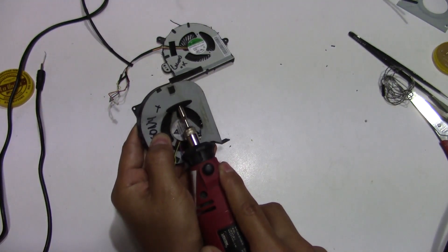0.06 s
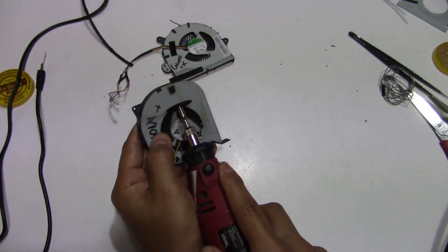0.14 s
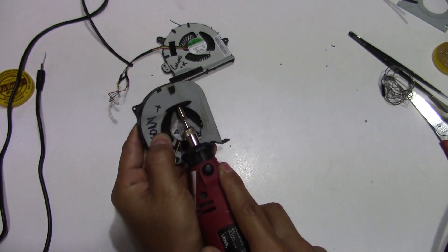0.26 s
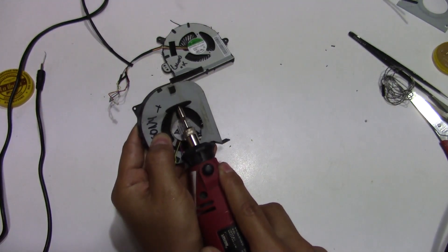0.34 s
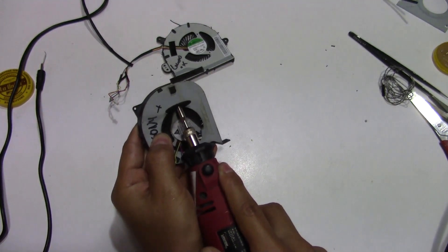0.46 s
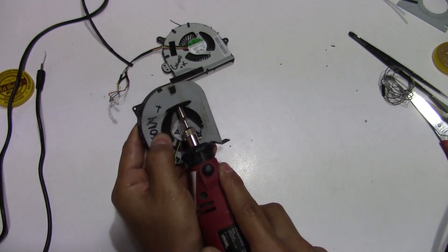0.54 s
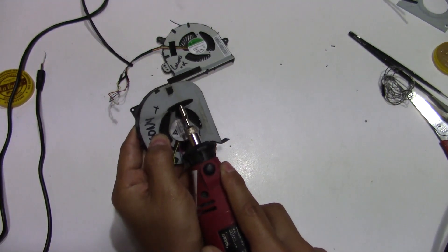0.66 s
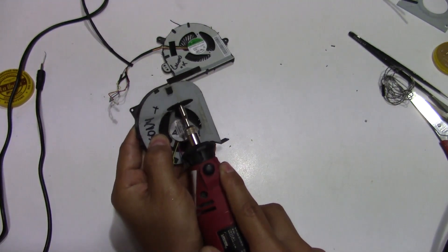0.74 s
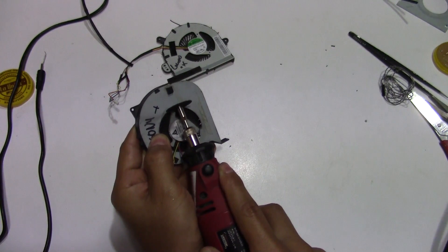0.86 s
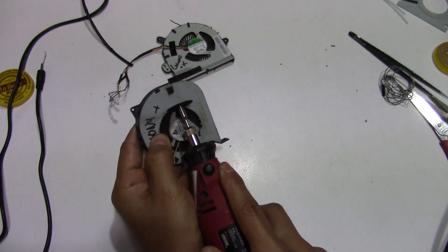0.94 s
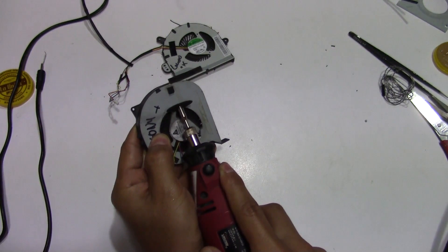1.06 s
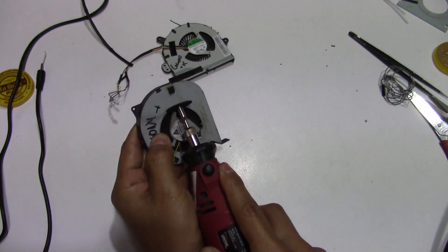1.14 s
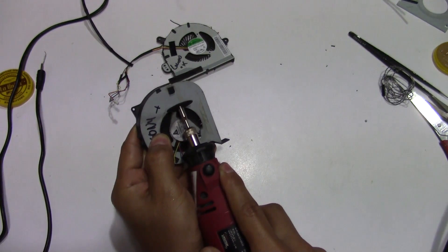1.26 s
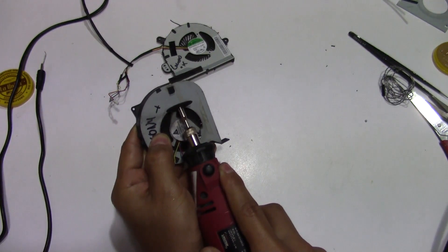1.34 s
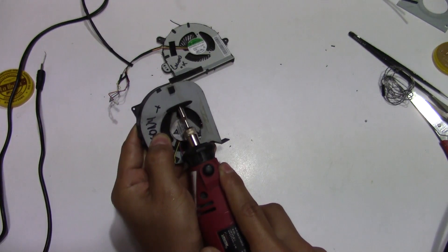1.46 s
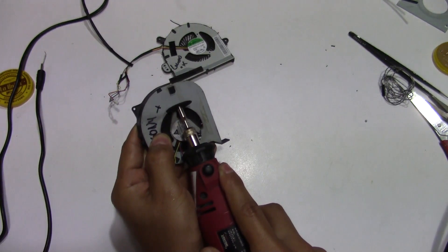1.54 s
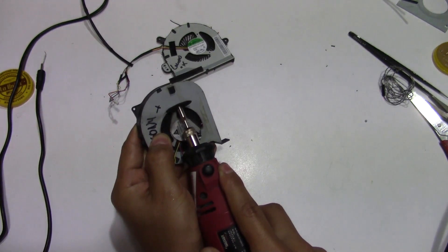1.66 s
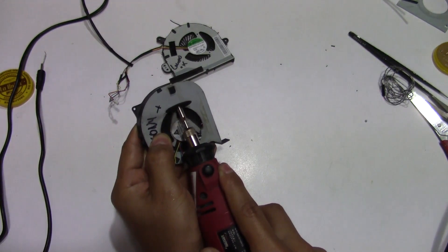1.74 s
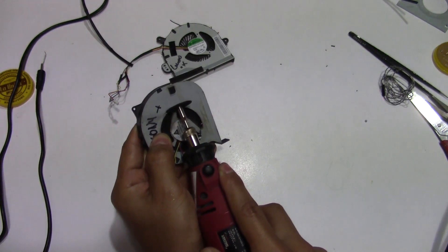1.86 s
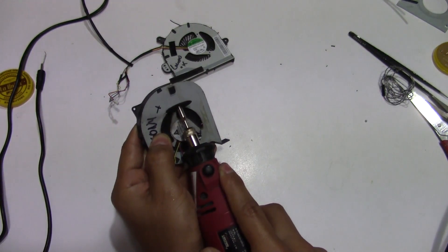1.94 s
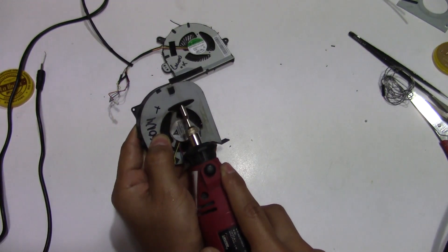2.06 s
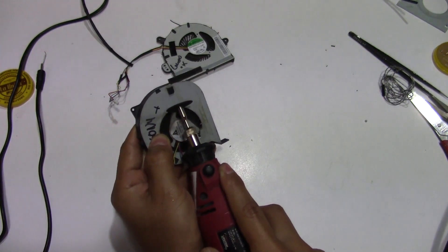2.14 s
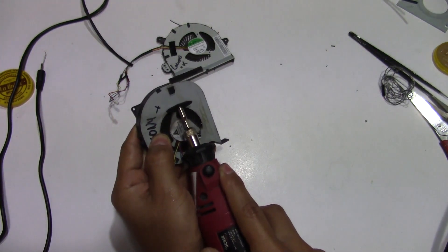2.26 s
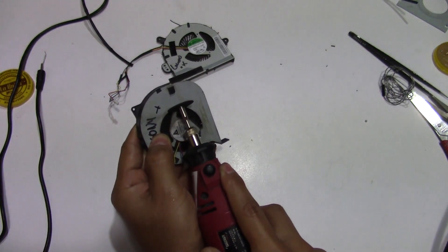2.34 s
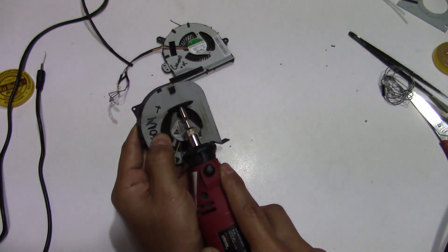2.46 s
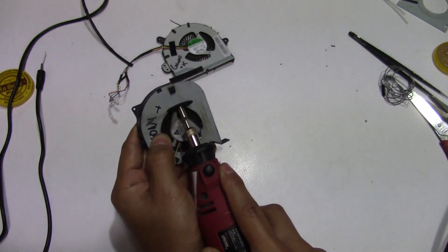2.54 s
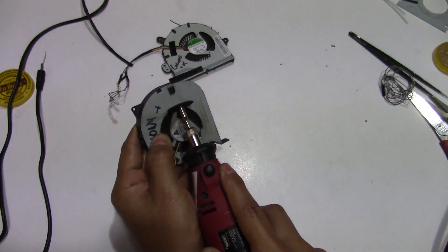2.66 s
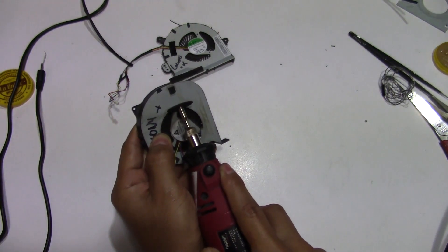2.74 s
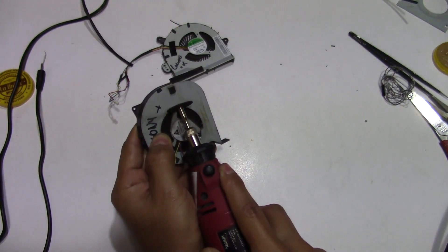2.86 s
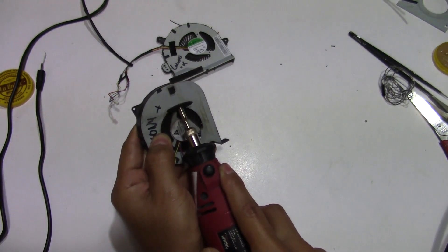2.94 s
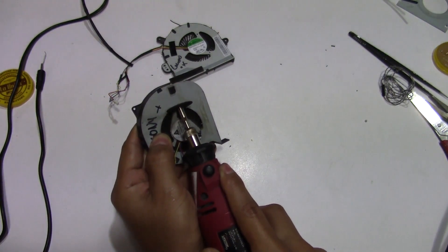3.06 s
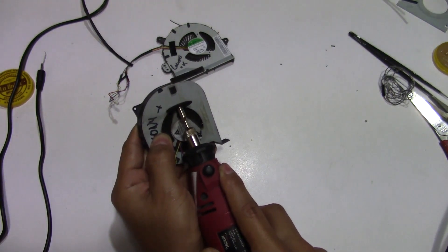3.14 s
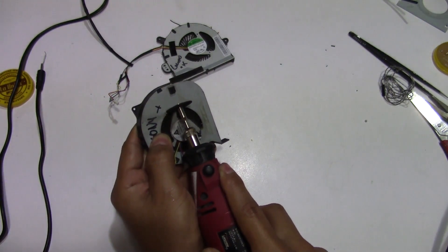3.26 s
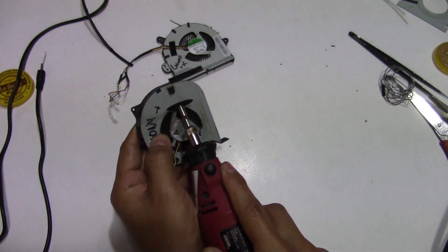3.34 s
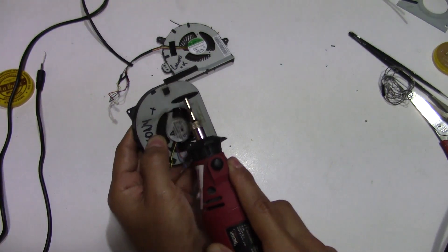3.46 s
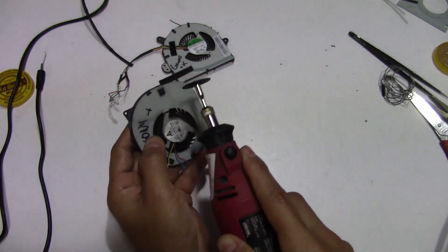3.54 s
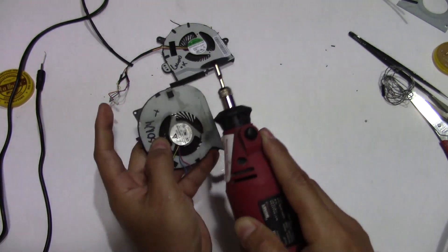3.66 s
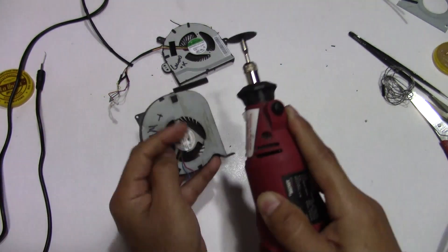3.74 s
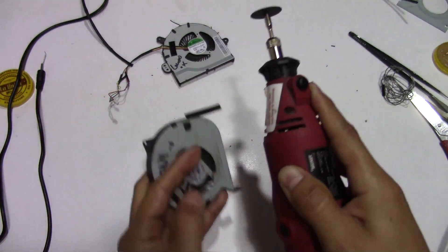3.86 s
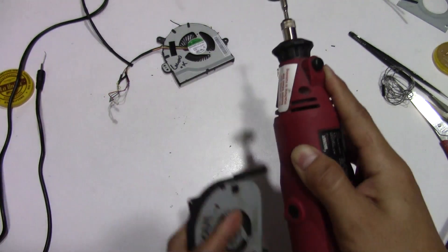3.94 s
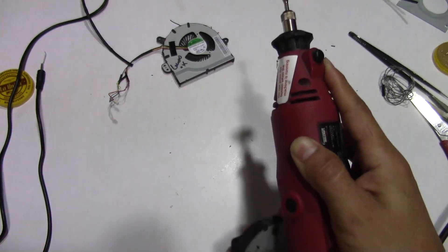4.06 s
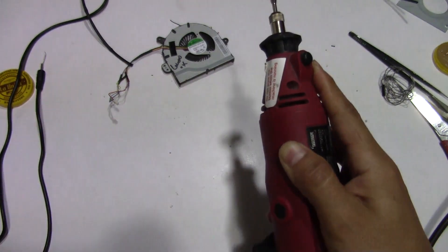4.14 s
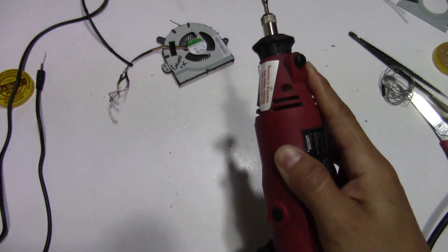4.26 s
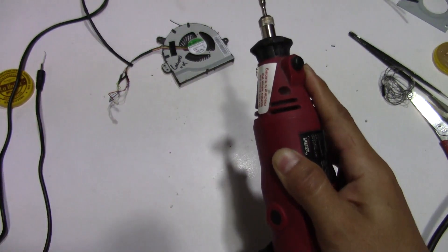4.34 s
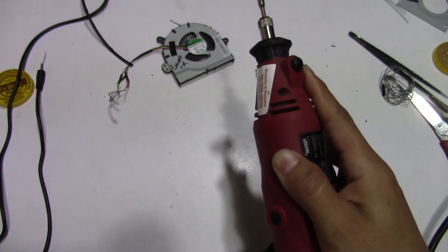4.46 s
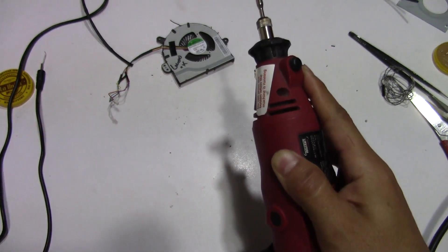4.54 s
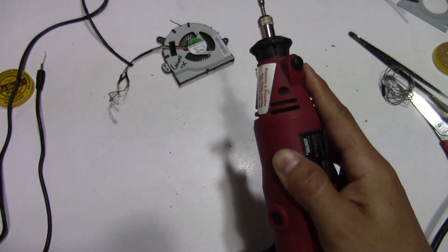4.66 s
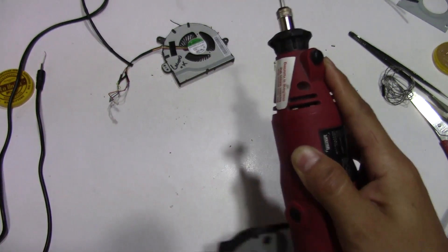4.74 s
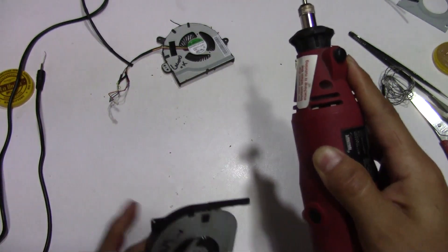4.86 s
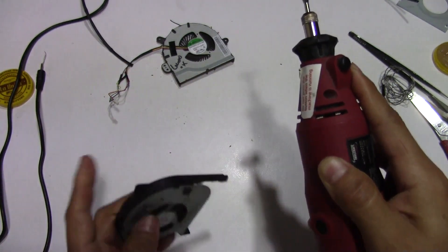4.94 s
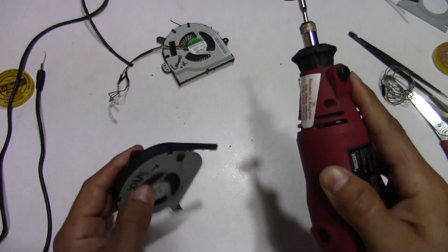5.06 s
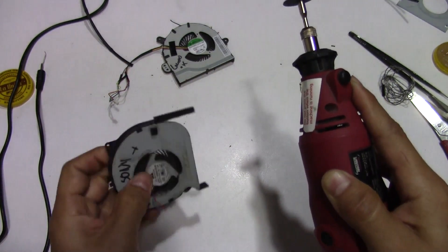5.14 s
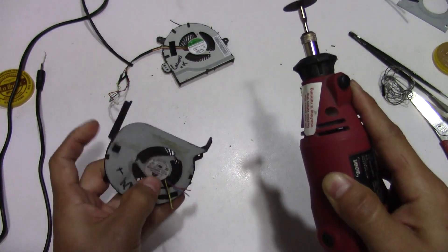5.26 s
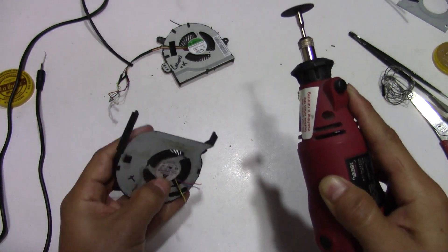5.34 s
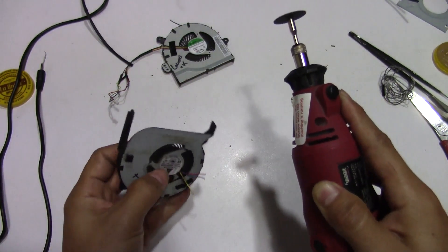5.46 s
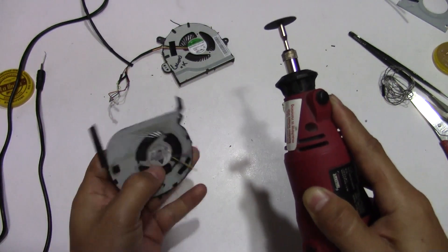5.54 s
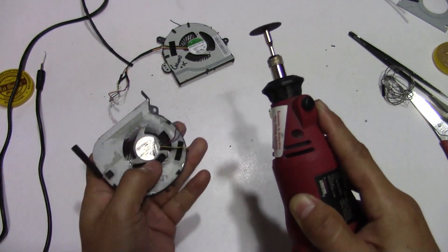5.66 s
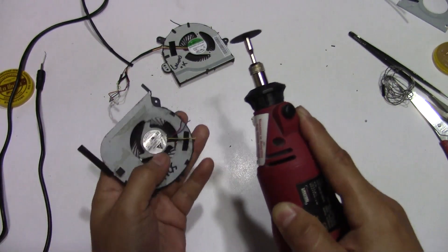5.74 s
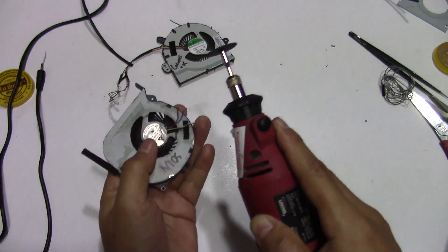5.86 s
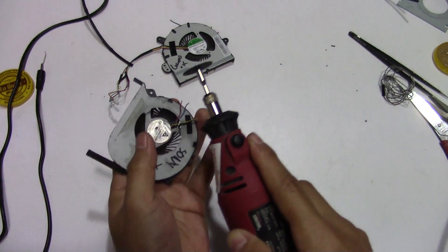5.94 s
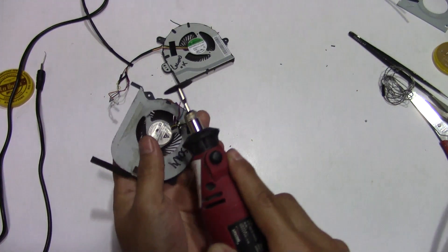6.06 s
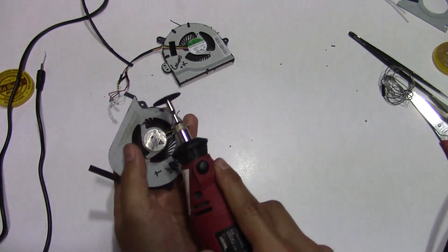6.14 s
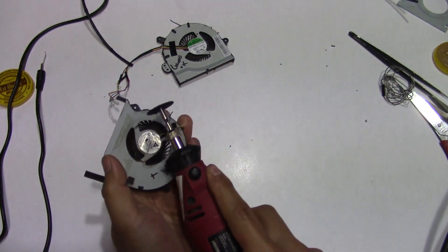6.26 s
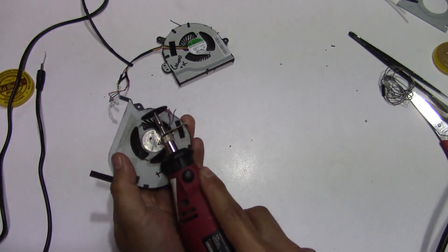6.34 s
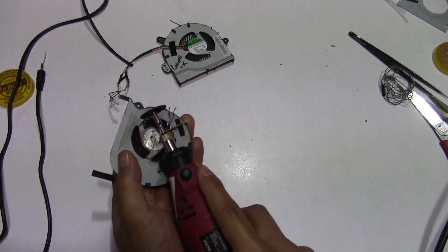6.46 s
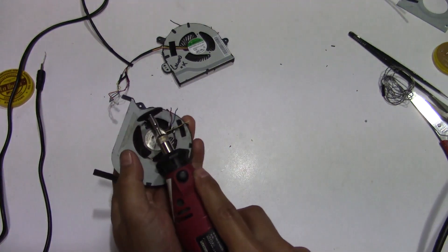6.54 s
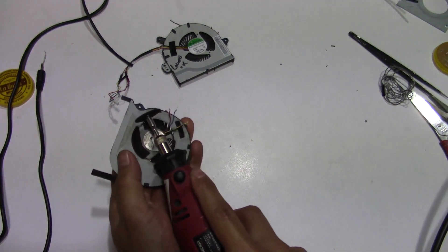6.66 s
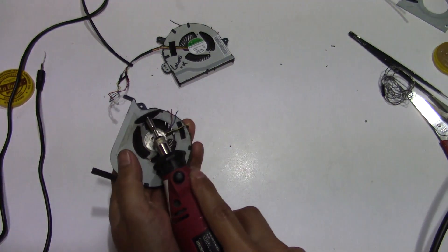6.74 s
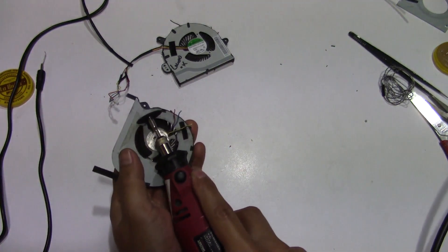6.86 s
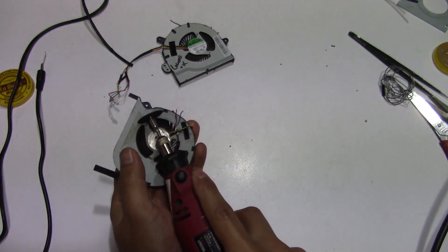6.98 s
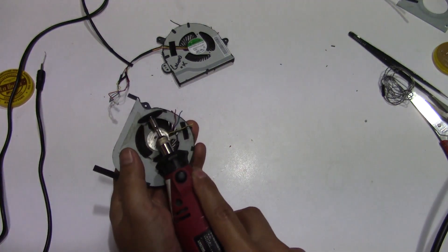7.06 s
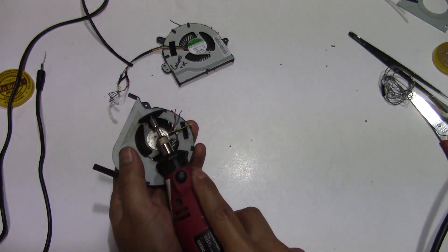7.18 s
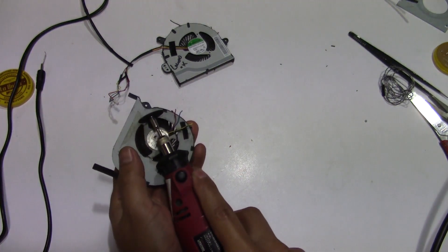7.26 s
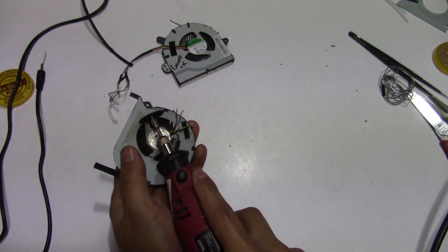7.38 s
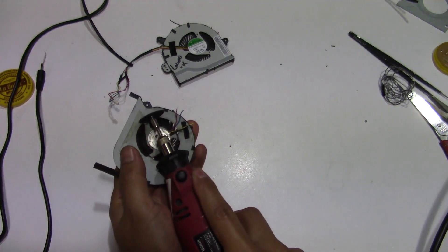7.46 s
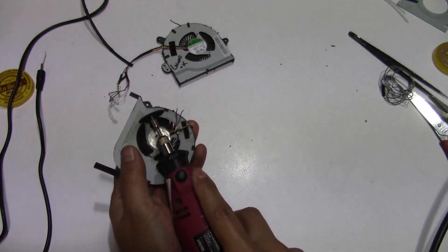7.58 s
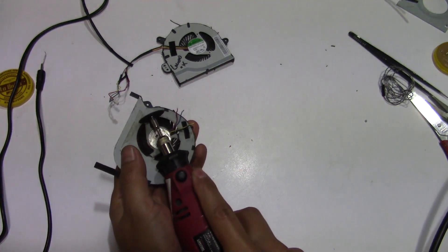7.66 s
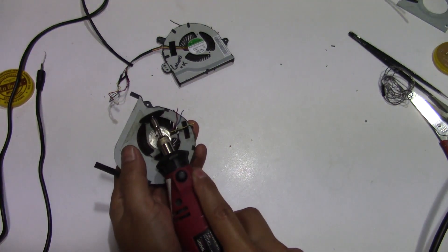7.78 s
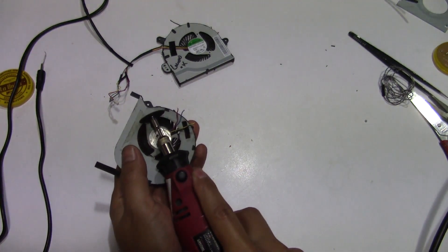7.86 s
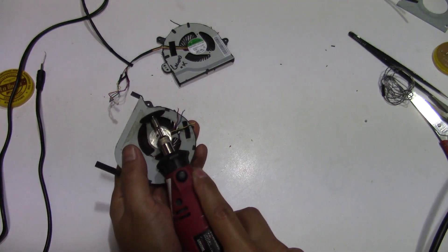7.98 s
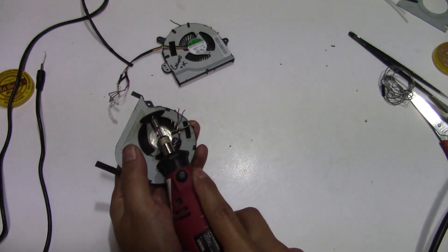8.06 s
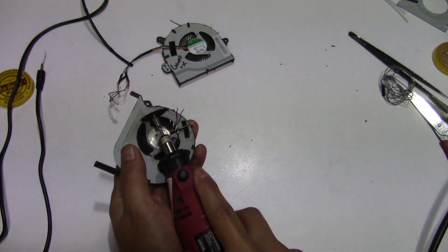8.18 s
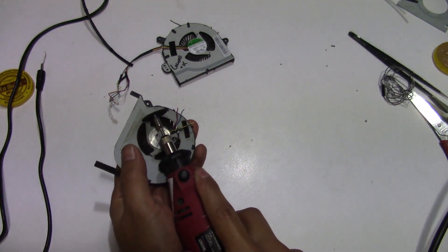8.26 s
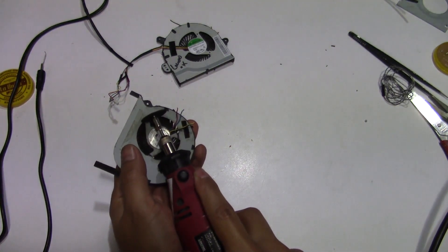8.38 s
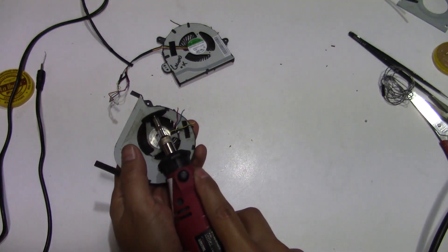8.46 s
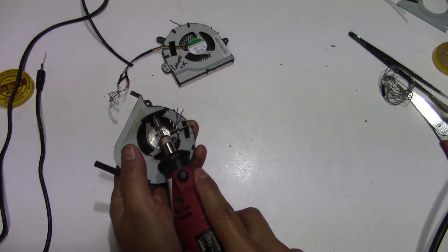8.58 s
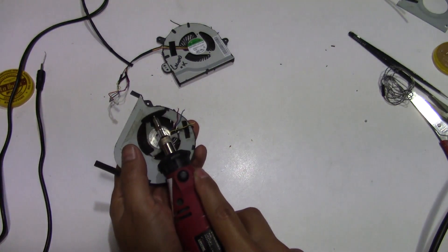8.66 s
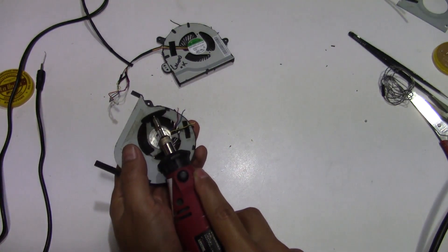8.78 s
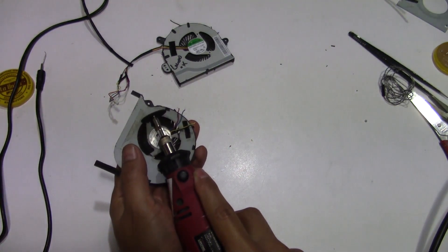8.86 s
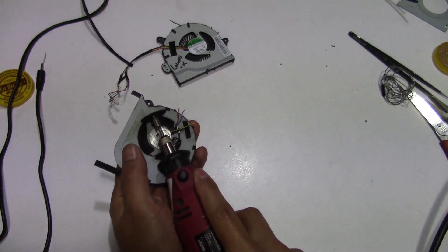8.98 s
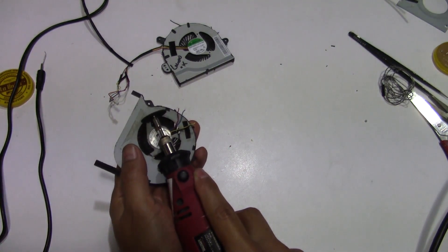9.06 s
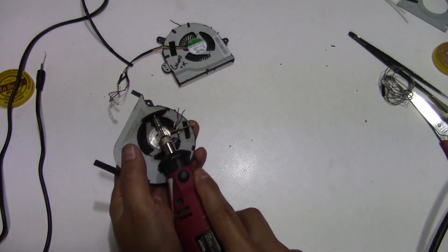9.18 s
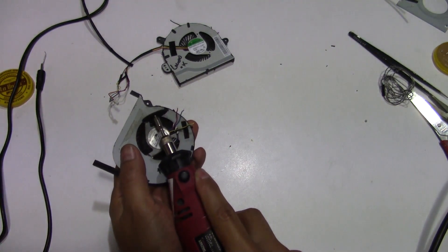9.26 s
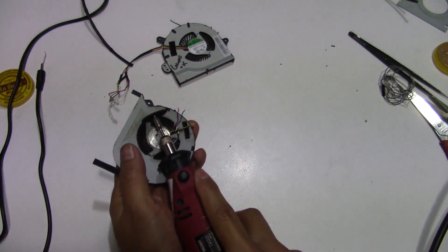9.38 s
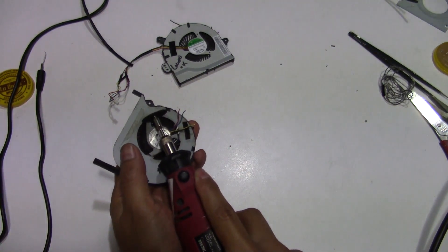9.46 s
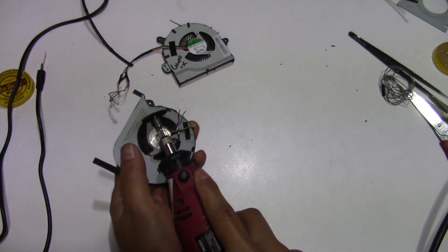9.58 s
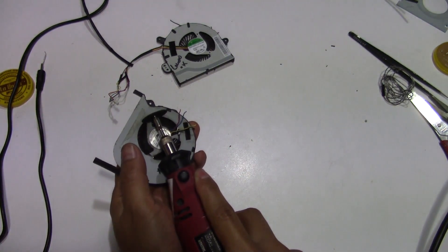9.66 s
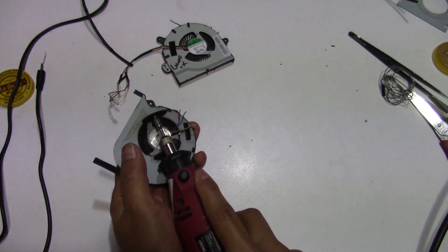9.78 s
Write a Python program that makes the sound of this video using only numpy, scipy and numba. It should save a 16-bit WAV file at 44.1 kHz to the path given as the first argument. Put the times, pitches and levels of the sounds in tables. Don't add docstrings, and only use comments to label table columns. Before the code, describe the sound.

Small electric cutting disc grinds a thin plastic frame, motor bogging and recovering, then climbing to a high whine before shrill, scraping cuts at close range.

```python
import sys
import numpy as np
from scipy import signal
from scipy.fft import rfft, irfft
from scipy.io import wavfile
from scipy.ndimage import uniform_filter1d, minimum_filter1d
from numba import njit

SR = 44100
rng = np.random.default_rng(int(sys.argv[2]) if len(sys.argv) > 2 else 0)


def gain_from_db(level_db):
    decades = np.asarray(level_db, float) / 20
    return 10 ** decades


def inscribe(sig):
    pcm = np.round(np.clip(np.atleast_2d(sig).T, -1, 1) * 32767)
    wavfile.write(sys.argv[1], SR, pcm.astype(np.int16))


N = 432621
T, HZ = np.arange(N) / SR, np.fft.rfftfreq(N, 1 / SR)
MAINS_HZ = 120
FAN_LIMIT_HZ = 255
TURNED_S = 5


def unit(x):
    return x / np.sqrt(np.mean(x ** 2))


def points(table):
    f, db = np.transpose(table)
    return gain_from_db(np.interp(np.log(HZ + 1), np.log(f), db))


def resonances(table, hz, valley_db, order=1):
    peaks = sum(gain_from_db(db) ** 2 / (1 + (2 * (hz - f) / w) ** 2) ** order for f, w, db in table)
    return np.sqrt(gain_from_db(valley_db) ** 2 + peaks)


def dip(hz, width, db):
    return gain_from_db(db * np.exp(-((HZ - hz) / width) ** 2))


def above(hz, power):
    return 1 / (1 + (hz / (HZ + 1)) ** power)


def halves(x, gain, lo_hz, split_hz):
    spec = rfft(x) * gain
    over = above(split_hz, 6)
    power = np.abs(spec) ** 2 * 2 / N ** 2
    low_rms = np.sqrt(power[(HZ > lo_hz) & (HZ < split_hz)].sum())
    high_rms = np.sqrt(power[HZ > split_hz].sum())
    return irfft(spec * (1 - over), N) / low_rms, irfft(spec * over, N) / high_rms


def walk(rate):
    k = int(SR / rate)
    return 0.14 * uniform_filter1d(np.repeat(rng.standard_normal(N // k + 1), k), k)[:N]


def throb(turns, depth, sharp):
    swell = np.exp(sharp * (np.cos(2 * np.pi * turns) - 1))
    return unit(1 + depth * unit(swell))


def rough_band(rate, angle):
    return unit(walk(rate) * np.sin(angle) + walk(rate) * np.cos(angle))


@njit
def repeat(x, lag, share):
    y = np.zeros(len(x))
    for i in range(len(x)):
        k = int(lag[i])
        y[i] = x[i] * np.sqrt(1 - share[i] ** 2)
        if i > k + 1:
            y[i] += share[i] * ((1 + k - lag[i]) * y[i - k] + (lag[i] - k) * y[i - k - 1])
    return y


# loaded t/s, f/Hz, freed t/s, f/Hz
BOGS = [
    (0.0, 68, 0.72, 31.5),
    (1.0, 83.5, 2.07, 31.7),
    (2.44, 91, 3.3, 24.5),
]
# t/s, f/Hz
SPIN_UP = [(3.5, 41.4), (3.85, 79.5), (4.15, 113.3), (4.39, 132.7), (4.76, 163.6), (5.21, 190),
           (5.9, 215.6), (6.36, 225.8), (6.91, 234.7)]
# t/s, f/Hz
LATE = [(7.3, 238.3), (7.65, 238.8), (7.96, 238.3), (8.23, 218.3), (8.57, 222.3), (8.9, 201.5), (9.28, 178),
        (9.59, 192.8), (9.81, 193.5)]


def shaft():
    s, hz = np.concatenate([np.reshape(BOGS, (-1, 2)), SPIN_UP[:1]]).T
    place = np.interp(T, s, np.arange(len(s)))
    k = np.minimum(place.astype(int), len(s) - 2)
    bend = np.where(k % 2, 1.25, 1.5)
    early = hz[k + 1] + (hz[k] - hz[k + 1]) * (1 - (place - k)) ** bend
    s, hz = np.transpose(SPIN_UP + LATE)
    late = FAN_LIMIT_HZ * np.tanh(np.interp(T, s, np.arctanh(hz / FAN_LIMIT_HZ)))
    return np.where(T < s[0], early, late)


# f/Hz, low rush level/dB, high rush level/dB, whine level/dB, slot whine level/dB
MOTOR = [(29.2, -37, -58.5, -42, -26.5), (47, -34.5, -38, -42, -22), (77.5, -33, -29.5, -44, -19),
         (110, -31.5, -23.5, -40, -13), (160, -29, -22.5, -37, -5.5), (189, -25, -21, -32.5, -4),
         (236, -23, -20.5, -29, -2), (228.5, -21.5, -21, -26, -2)]


def by_speed(hz):
    at, *columns = np.transpose(MOTOR)
    return [np.interp(hz, at, c) for c in columns]


def line(turns, k, blur):
    blur = np.clip(blur, 0, 1)
    angle = 2 * np.pi * (round(k) * turns + k * 0.0022 * walk(40) + rng.random())
    rough = rough_band(k * 9, angle) / np.sqrt(2)
    return np.sqrt(1 - blur ** 2) * np.sin(angle) + blur * rough


SLOTS = (8, 16, 24, 32, 40, 48, 56, 64, 72, 80)
SLOTS_DB = (-11, -2, -1, -3, -11.5, -11, -11, -10.5, -11, -12)
SLOT_LOAD_DB = (5, -2.5, -1, 1, 10, 7, -1, 2, 7, 3)
SLOT_BLUR = (.08, .5, .3, .6, .7, 1.8, 1.8, 2.6, 3, 3)
SLOT_GULP = (.15, 1.2, .8, .8, .4, .5, .5, .5, .5, .5)
# f/Hz, width/Hz, level/dB
SLOT_RINGS = [(890, 340, -15), (1400, 166, -16), (1900, 120, -22), (2753, 390, -13), (3914, 400, -15.5),
              (4280, 260, -18.5), (4800, 240, -25), (6350, 900, -22), (7000, 450, -23), (8840, 1100, -18),
              (10700, 1200, -17), (13300, 1400, -26), (15000, 1200, -30)]
# f/Hz, width/Hz, level/dB
SLOT_RINGS_DOWN = [(1514, 250, -20), (1910, 310, -25.5), (2830, 530, -17), (3530, 470, -24.5),
                   (3820, 130, -21), (4600, 340, -25.5), (5295, 370, -24), (5700, 350, -22.5),
                   (6850, 460, -18.5), (8900, 690, -20), (10040, 500, -21), (13200, 980, -22),
                   (14700, 1000, -30)]


def slots(hz, turns):
    tipped_s, tipping_s = 5.6, 0.4
    mains = 2 * np.pi * MAINS_HZ * T
    gulps = np.cos(mains) + 0.48 * np.cos(2 * mains) + 0.4 * np.cos(3 * mains)
    gulps = np.clip(2.9 - hz / 90, .8, 1.5) * gulps
    speed_blur = (hz / FAN_LIMIT_HZ + 0.0036) ** 2
    whine = 0
    for k, db, load_db, blur, gulp in zip(SLOTS, SLOTS_DB, SLOT_LOAD_DB, SLOT_BLUR, SLOT_GULP):
        level = gain_from_db(db + load_db * contact() + 4.2 * walk(9))
        whine = whine + level * (1 + gulp * gulps) * line(turns, k, blur * speed_blur)
    whine = whine * throb(turns, depth=0.5, sharp=1.8) * gain_from_db(by_speed(hz)[3])
    spec = rfft(whine)
    up = irfft(spec * resonances(SLOT_RINGS, HZ, valley_db=-42, order=2), N)
    down = irfft(spec * resonances(SLOT_RINGS_DOWN, HZ, valley_db=-42, order=2), N)
    return up + np.clip((T - tipped_s) / tipping_s + .5, 0, 1) * (down - up)


# multiple, level/dB, blur share
ORDERS_DB = [(2.98, 2, 0.26), (3.9, -6.5, 0.043), (5.06, -5.5, 0.39), (6.8, -11, 0.083), (8.95, 0, 0.092),
             (10.2, -12, 0.14), (33, -8, 0.37), (44.7, -24.5, 0.99), (60, -18, .9)]
# f/Hz, width/Hz, level/dB
HOUSING = [(620, 160, -4), (1020, 46, -4.5), (1222, 104, 3.5), (1340, 190, -37.5), (1750, 210, -17),
           (3340, 450, 6), (7400, 350, 3.5), (10600, 610, 1), (8900, 900, 11), (13300, 850, -3.5)]


def brush_whine(hz, turns, level_db):
    whine = sum(gain_from_db(db + 14.3 * walk(4.6)) * line(turns, k, blur) for k, db, blur in ORDERS_DB)
    whine = whine * throb(MAINS_HZ * T, depth=18.0, sharp=2.8) * gain_from_db(level_db + contact())
    whine = whine * np.clip((hz - 60) / 170, 0, 1)
    return irfft(rfft(whine) * resonances(HOUSING, HZ, valley_db=-32) * above(553, 8), N)


def unbalance(hz, turns):
    top_db = -1.5 * np.clip((hz - 224) / 9, 0, 1)
    held_db = -7 * contact() * np.clip((212 - hz) / 12, 0, 1)
    level = gain_from_db(-44.5 + top_db + held_db + 2 * walk(8.6)) * np.clip(hz / 200, 0, 1) ** 3
    oval = gain_from_db(-6.5 + 6.1 * contact())
    return level * (np.sin(2 * np.pi * turns) + oval * np.sin(4 * np.pi * turns))


# f/Hz, width/Hz, level/dB
VENTS = [(1400, 290, -6.5), (1820, 230, -1.5), (2844, 840, -1), (3907, 960, -2), (4430, 260, -5),
         (4820, 710, -2), (6570, 1200, -1.5), (7250, 610, 1), (8050, 660, 1.5), (8770, 600, 0.5),
         (10500, 3000, -6.5)]
# f/Hz, level/dB per Hz
RUSH_SLOW = [(35, -70), (60, -56), (238, -12.5), (448, -10), (607, -2.5), (666, -2), (991, -1.5),
             (1550, -6.5), (7230, -17.5), (16000, -32)]
# f/Hz, level/dB per Hz
RUSH_FAST = [(35, -82), (60, -46), (300, -12.5), (515, -16), (579, -2), (698, -5), (767, -3.5),
             (1200, -1.5), (2970, -6), (3760, -2), (5210, -5.5), (5590, 0), (7750, -4), (13300, -10.5),
             (16000, -20)]


def rush(hz, low_db, high_db):
    fast = np.clip((hz - 60) / 170, 0, 1)
    lifted_s, leaning_db = 5.4, 1
    air = repeat(rng.standard_normal(N), SR / hz, 0.2 + 0.086 * fast)
    air = air * throb(MAINS_HZ * T + 0.6, depth=0.52, sharp=1.0)
    vents = resonances(VENTS, HZ, valley_db=-7, order=2)
    slow_low, slow_high = halves(air, vents * points(RUSH_SLOW), lo_hz=480, split_hz=2730)
    fast_low, fast_high = halves(air, vents * points(RUSH_FAST), lo_hz=500, split_hz=3080)
    low = (1 - fast) * slow_low + fast * fast_low
    high = (1 - fast) * slow_high + fast * fast_high
    return gain_from_db(low_db - 5.5) * low + gain_from_db(high_db - 1.5 + leaning_db * (T < lifted_s)) * high


def motor(hz, turns):
    low_db, high_db, whine_db, _ = by_speed(hz)
    return brush_whine(hz, turns, whine_db) + unbalance(hz, turns) + rush(hz, low_db, high_db)


# start t/s, end t/s, attack t/s, body level/dB, hiss level/dB
CUTS = [
    (-0.1, 0.711, 0.03, -22.5, -21.5),
    (0.984, 2.065, 0.038, -22, -20.5),
    (2.358, 3.197, 0.059, -21, -20.5),
    (3.199, 3.279, 0.037, -24.5, -31),
    (3.287, 3.326, 0.0084, -29.5, -41),
    (6.965, 7.073, 0.01, -28, -16.5),
    (7.725, 8.238, 0.18, -19.5, -12),
    (8.517, 9.265, 0.028, -18, -11.5),
    (9.576, 9.91, 0.091, -17, -15.5),
]


def contact():
    touch = sum((T > c[0]) & (T < c[1]) for c in CUTS)
    return uniform_filter1d(touch.astype(float), size=600)


def pressure(hz):
    entry_db, release_s = -18.5, 0.017
    body, hiss = 0, 0
    for start, end, attack, body_db, hiss_db in CUTS:
        swell_db = entry_db * np.clip(1 - (T - start) / attack, 0, 3)
        hold = np.clip((T - start) / 0.0099 + 1, 0, 1) * np.clip(1 - (T - end) / release_s, 0, 1) ** 2
        octaves = np.log2(hz / np.interp((start + end) / 2, T, hz))
        body_law, hiss_law = (2, 5) if start < TURNED_S else (-9, -9)
        body = body + hold * gain_from_db(body_db + 0.63 * swell_db + body_law * octaves)
        hiss = hiss + hold * gain_from_db(hiss_db + swell_db + hiss_law * octaves)
    return body, hiss


# t/s, length t/s, period t/s, peak level/dB
SKIDS = [
    (3.3124, 0.005, 0.017, -17),
]
# t/s, peak level/dB
TICKS = [(3.3444, -33), (3.3544, -30), (3.3624, -39), (3.3782, -28), (3.3864, -26), (3.3944, -27),
         (3.4131, -44), (3.43, -21.5), (3.4524, -57), (3.4934, -45), (3.5104, -54), (7.736, -1),
         (7.7434, -1), (8.5286, -7), (8.5341, -7), (8.534, -3), (8.5464, -1), (8.556, -4), (8.5644, -7),
         (9.5625, 4), (9.577, -3), (9.5943, 1), (9.6048, 0), (9.616, -6), (9.622, 3), (9.636, -3),
         (9.6464, -10), (9.6564, -1), (9.661, -2), (9.6724, -14), (9.6774, -8), (9.6864, 3), (9.6974, -6),
         (9.7034, -1), (9.7123, 12)]
# t/s, peak level/dB
ENTRY_1 = [(0.9684, -10), (0.9792, -4), (0.9914, -18), (1.0111, -2), (1.0326, 5), (1.0454, -3), (1.057, -7),
           (1.07, 3), (1.082, -2), (1.0944, -5), (1.1065, -5), (1.1204, 1), (1.1353, -4), (1.1474, 2),
           (1.1614, -4), (1.1754, -7), (1.1884, -2)]
# t/s, peak level/dB
ENTRY_2 = [(2.3266, -6.5), (2.3391, -6), (2.3705, -2), (2.3824, -11), (2.3904, -11), (2.4009, -1),
           (2.413, 2), (2.424, 18), (2.4334, -1), (2.446, -1), (2.4603, -2), (2.472, -3), (2.4862, 2),
           (2.4964, -5)]


def skids():
    slowing, scatter_db, fade_db = 0.0075, 2.0, -0.54
    marks, sizes = np.zeros(N), np.zeros(N)
    for (s, length, period, db), chance in zip(SKIDS, rng.standard_normal((len(SKIDS), 32))):
        n = np.arange(1 + int(length / period))
        at = ((s + period * n * (1 + slowing * n)) * SR).astype(int)
        marks[at] = 1
        sizes[at] = gain_from_db(db - 18 + scatter_db * chance[n] * (n > 0) + fade_db * n)
    for table, trim_db in [(TICKS, -7.5), (ENTRY_1, -10), (ENTRY_2, -10)]:
        for s, db in table:
            marks[int(s * SR)], sizes[int(s * SR)] = 1, gain_from_db(db + trim_db)
    t = np.arange(-2000, 2001) / SR

    def bell(x, late, width):
        return signal.fftconvolve(x, np.exp(-((t - late) / width) ** 2), mode="same")

    return bell(sizes, 0.0022, 0.0016), 1 - np.clip(bell(marks, 0, 0.014), 0, 1)


# f/Hz, width/Hz, level/dB
FRAME_BACK = [(1475, 95, 4.5), (1900, 230, -0.5), (2590, 71, 4), (3540, 300, 3.5), (4800, 100, -4),
              (5710, 91, -24), (6320, 730, -1), (8870, 820, -6.5), (10300, 210, -6), (11050, 230, -6),
              (12050, 650, -2.5), (13300, 440, -5), (14400, 400, -10), (15700, 52, -28)]


def thumps(turns):
    pulses = np.exp(90 * (np.cos(2 * np.pi * turns) - 1))
    ring = resonances(FRAME_BACK[:4], HZ, valley_db=-15.5) * above(1100, 4)
    return gain_from_db(-16.5 + 1.8 * walk(9.1)) * (T > TURNED_S) * unit(irfft(rfft(pulses) * ring, N))


# start t/s, end t/s, from f/Hz, to f/Hz,
# level/dB
SINGING = [(5.65, 6.338, 3347, 3596, -31), (6.199, 6.896, 6640, 8060, -27.5),
           (7.737, 8.066, 12350, 11840, -20), (7.774, 7.997, 10400, 10300, -26),
           (7.908, 8.244, 6430, 6940, -16), (7.982, 8.224, 4800, 4700, -18),
           (7.727, 8.258, 3680, 3420, -25.5), (8.55, 8.677, 13300, 13300, -19),
           (8.576, 8.74, 7260, 7000, -26), (8.665, 9.127, 9570, 8100, -14.5),
           (8.743, 9.264, 6570, 6280, -15), (9.02, 9.28, 12900, 11500, -32), (9.65, 9.77, 7250, 7400, -16),
           (9.74, 9.9, 8840, 9160, -18)]


def singing(push):
    out = 0
    for start, end, from_hz, to_hz, db in SINGING:
        place = np.clip((T - start) / (end - start), 0, 1)
        angle = 2 * np.pi * np.cumsum(from_hz + (to_hz - from_hz) * place) / SR
        band = rough_band(0.06 * from_hz, angle)
        out = out + gain_from_db(db) * np.sqrt(np.abs(np.sin(np.pi * place))) * band
    return out * push


# f/Hz, width/Hz, level/dB
FRAME_FRONT = [(1417, 220, 1), (1820, 340, -4), (2610, 450, -3.5), (3000, 400, -1.5), (3540, 570, 1.5),
               (4100, 340, -3.5), (4690, 270, -0.5), (5360, 240, -2.5), (5990, 630, 0), (6660, 490, -0.5),
               (7540, 360, -0.5), (8750, 1050, -0.5), (10300, 2450, -0.5), (14800, 1000, -13)]
# f/Hz, width/Hz, level/dB
FRONT_DIP = (13500, 550, -7)


def cutting(hz, turns):
    body_gain, hiss_gain = pressure(hz)
    scrapes, settled = skids()
    back = T > TURNED_S
    bite = gain_from_db(2.8 * np.clip(rng.standard_normal(4000), -2, 1.3))[np.floor(turns + .5).astype(int)]
    spot = np.exp(np.where(back, 2.4, 4) * (np.cos(2 * np.pi * turns) - 1))
    spot = spot + 0.12 * np.exp(4 * (np.cos(2 * np.pi * (turns - .45)) - 1))
    torque_front = throb(MAINS_HZ * T, depth=0.26, sharp=2.9)
    torque_back = throb(MAINS_HZ * T + 0.32, depth=3.2, sharp=1.46)
    torque = np.where(back, torque_back, torque_front)
    grit = rng.standard_normal(N) * gain_from_db(5.4 * walk(900))
    grit = unit(repeat(grit, SR / hz, np.where(back, .75, .3)))
    push = 1 + np.where(back, 6, 2.16 * 0.27) * spot * bite * settled
    push = push / np.sqrt(uniform_filter1d(push ** 2, size=4000))
    push = push * torque * gain_from_db(2.75 * walk(25) - 5.3 * (1.5 - settled))

    edge = above(1000, 4)
    front_gain = edge * dip(*FRONT_DIP) * resonances(FRAME_FRONT, HZ, valley_db=-10.5, order=2)
    rear_gain = edge / np.sqrt(1 + (HZ / 14700) ** 12) * resonances(FRAME_BACK, HZ, valley_db=-5.5)
    front = halves(grit * push, front_gain, lo_hz=1086, split_hz=4060)
    rear = halves(grit * push, rear_gain, lo_hz=1097.8, split_hz=4960)
    body, hiss = np.where(back, rear, front)
    single = rfft(grit * scrapes * ~back) * unit(front_gain) * above(2500, 2)
    single = single + rfft(grit * scrapes * back) * unit(rear_gain) * above(5500, 2)
    tearing = body_gain * (body + thumps(turns)) + hiss_gain * hiss
    return tearing + irfft(single, N) + singing(push)


# t/s, peak level/dB, f/Hz
SQUEAKS = [(1.0318, -1, 6650), (1.045, -5, 6930), (1.057, -1, 7400), (1.0704, -10, 7100), (1.0823, 2, 7200),
           (1.108, -1, 7160), (1.1353, -4, 6900), (2.4607, -2, 7000), (2.526, -8.5, 6600)]


def squeaks():
    out = 0
    for (s, db, hz), start in zip(SQUEAKS, rng.random((len(SQUEAKS), 1))):
        t = T - s - .001
        tone = np.sin(2 * np.pi * (hz * t * (1 - 12 * t) + start))
        out = out + gain_from_db(db) * np.exp(-(t / np.where(t < 0, .0008, .0016)) ** 2) * tone
    return out


# f/Hz, level/dB per Hz
RUMBLE = [(25, -14), (60, -13), (120, -2), (300, -14), (600, -39)]
# f/Hz, level/dB
HUM = [(120, -70), (240, -72), (360, -56), (600, -55), (840, -57)]
# t/s, length t/s, level/dB, f/Hz
KNOCKS = [(0.9, 0.036, -47, 270), (1.092, 0.066, -50, 90), (2.117, 0.019, -38, 282),
          (2.175, 0.064, -39, 305), (2.307, 0.025, -47, 260.1), (2.432, 0.039, -51, 110.3),
          (1.45, 0.2, -55, 40), (3.4, 0.2, -71, 40), (4.354, 0.012, -29, 1400), (7.021, 0.066, -52, 70.12),
          (7.817, 0.1102, -50, 69.96), (8.2, 0.11, -49, 45), (8.65, 0.17, -56, 50), (9.69, 0.14, -52, 60)]


def bench():
    rumble = unit(irfft(rfft(rng.standard_normal(N)) * points(RUMBLE), N))
    out = gain_from_db(-61.5 + 1.5 * contact() + 3.5 * walk(6.0)) * rumble
    out = out + sum(gain_from_db(db + 4 * walk(11)) * np.sin(2 * np.pi * hz * T) for hz, db in HUM)
    for s, length, db, hz in KNOCKS:
        thud = unit(irfft(rfft(rng.standard_normal(N)) / (1 + ((HZ - hz) / (0.39 * hz)) ** 2), N))
        out = out + gain_from_db(db) * np.exp(-((T - s) / length) ** 4) * thud
    return out


def room(dry):
    t60_s, level_db, top_hz = 0.33, -6, 4700
    tails = rng.standard_normal((2, SR // 2)) * gain_from_db(-60 * T[:SR // 2] / t60_s)
    tails = tails / np.sqrt(np.sum(tails ** 2, axis=1, keepdims=True))
    wet = rfft(signal.fftconvolve(dry, tails[0])[:N])
    return gain_from_db(level_db) * irfft(wet / np.sqrt(1 + (HZ / top_hz) ** 2), N)


# f/Hz, level/dB
SIDE_SHARE = [(60, -20), (200, -23), (380, -20.5), (700, -29.5), (1000, -31), (1500, -31.5), (2380, -34),
              (4400, -21.5), (8120, -24), (15000, -16.5)]
# t/s, place (left positive)
PLACE = [
    (3.2, .2),
    (5.3, -.9),
    (6.3, 0),
    (8.6, .5),
    (9.8, .2),
]


def scene():
    hz = shaft()
    turns = np.cumsum(hz) / SR
    dry = slots(hz, turns) + motor(hz, turns) + cutting(hz, turns) + squeaks()
    mid = dry + bench() + room(dry)
    share = rfft(mid) * points(SIDE_SHARE)
    lag_s = .0004
    side = irfft(share * np.exp(-2j * np.pi * (HZ * lag_s + 0.19)), N)
    side = side + np.interp(T, *np.transpose(PLACE)) * irfft(share, N)
    return np.array([mid + side, mid - side])


def band_limit(x):
    return signal.sosfilt(signal.butter(12, 16810, fs=SR, output="sos"), x)


# f/Hz, width/Hz, level/dB
AIR_DIP = (16000, 1000, -1.6)
# f/Hz, width/Hz, level/dB
LOW_DIP = (944, 71, -4.5)


def record(dry):
    mic_low_hz, top_hz, limit = 90, 15780, .9
    colour = dip(*AIR_DIP) * dip(*LOW_DIP) * above(mic_low_hz, 2)
    heard = irfft(rfft(dry) * colour, N)
    gain = np.minimum(1, limit / (np.abs(heard).max(axis=0) + 1e-9))
    gain = uniform_filter1d(minimum_filter1d(gain, size=65), size=64)
    mix = irfft(rfft(heard * gain) * (HZ < top_hz), N)
    return band_limit(mix)


dry = scene()
out = record(dry)
inscribe(out)
```